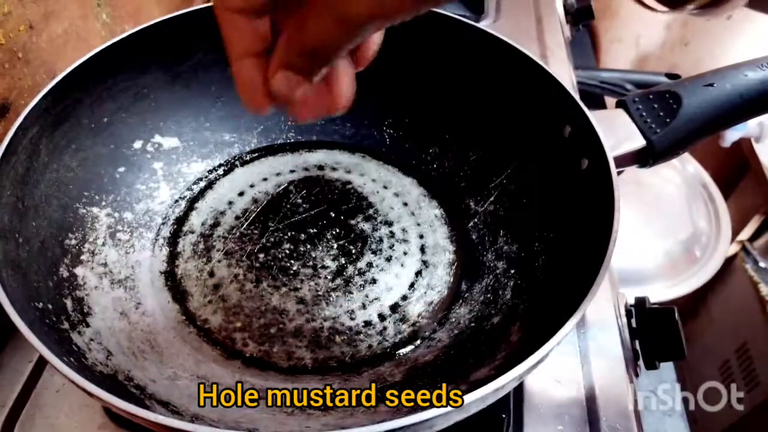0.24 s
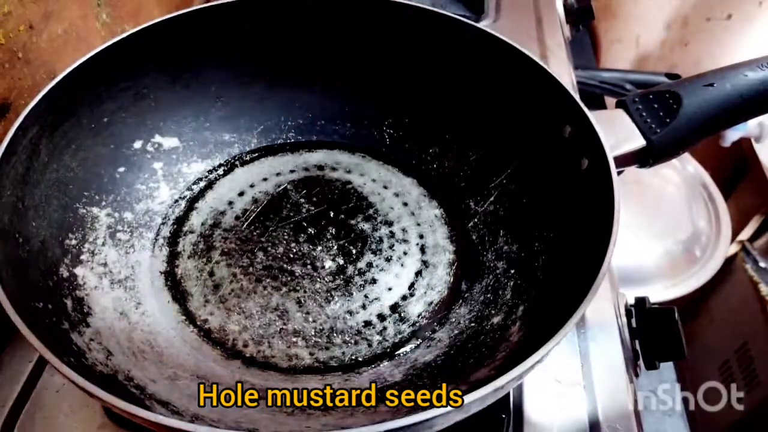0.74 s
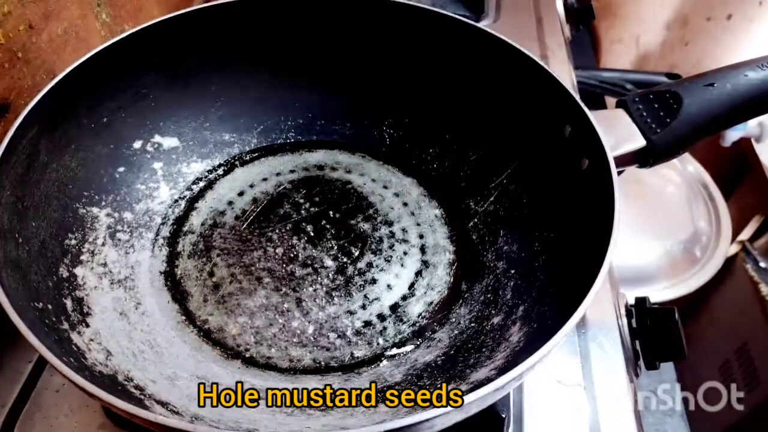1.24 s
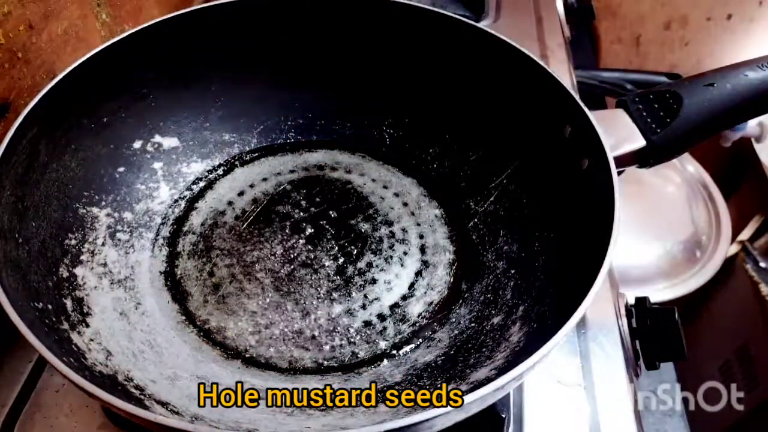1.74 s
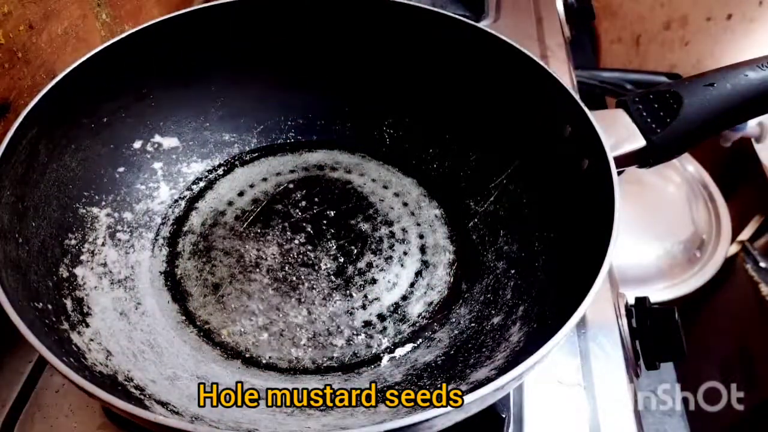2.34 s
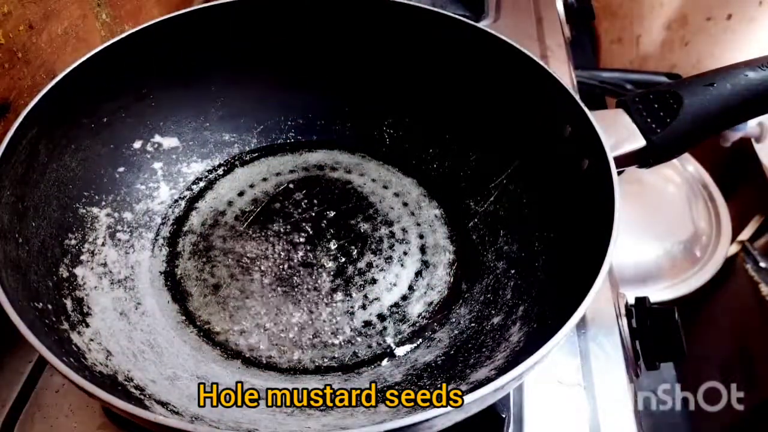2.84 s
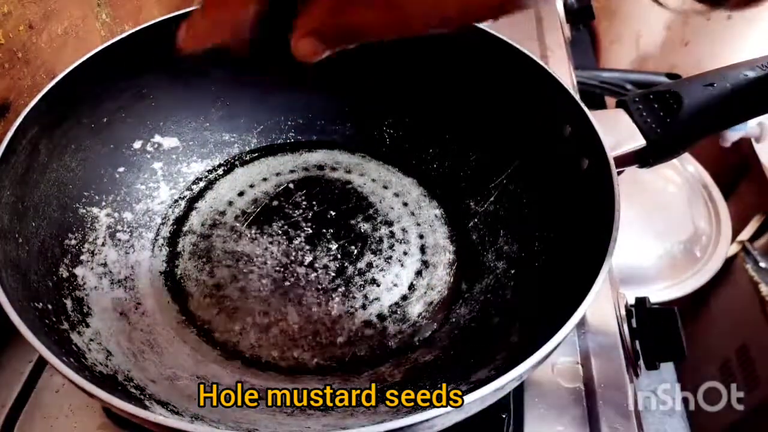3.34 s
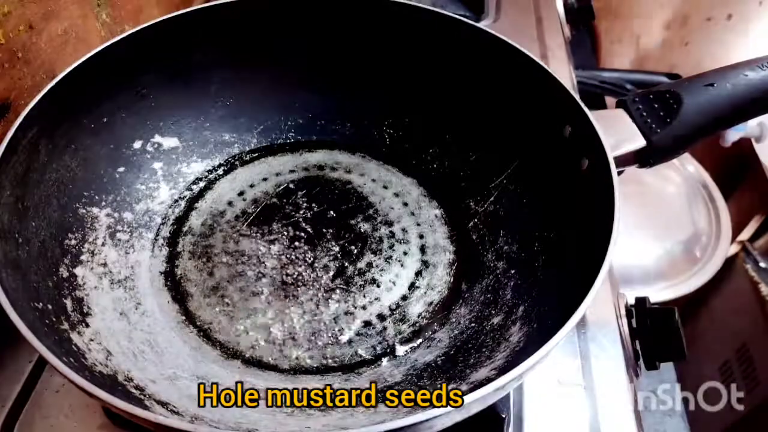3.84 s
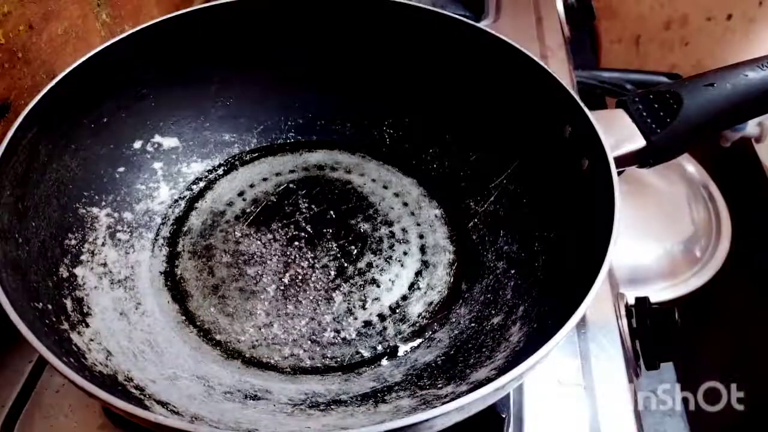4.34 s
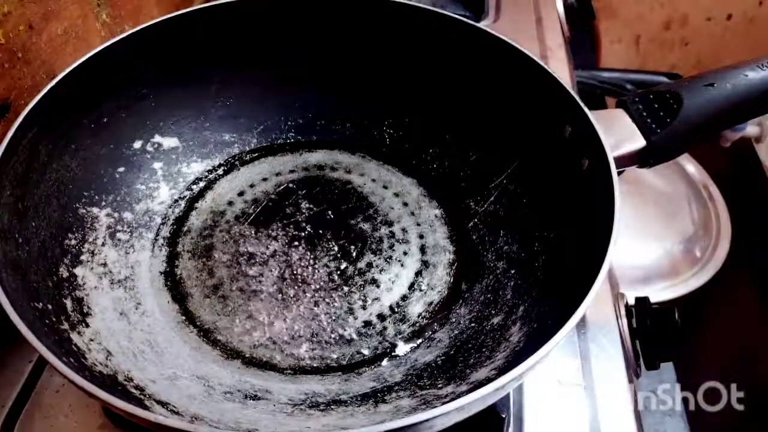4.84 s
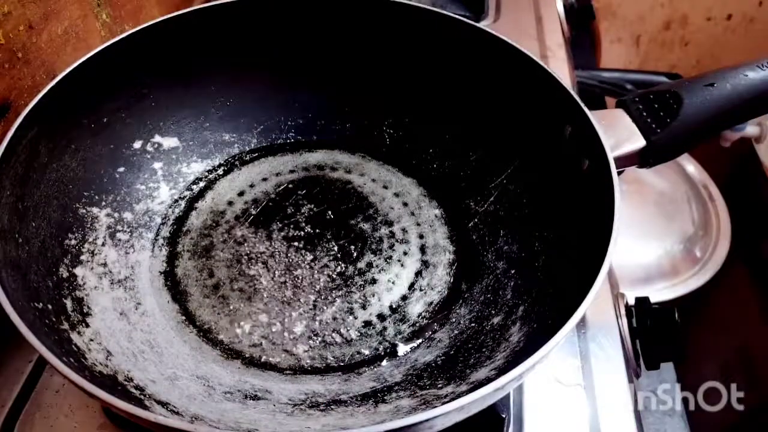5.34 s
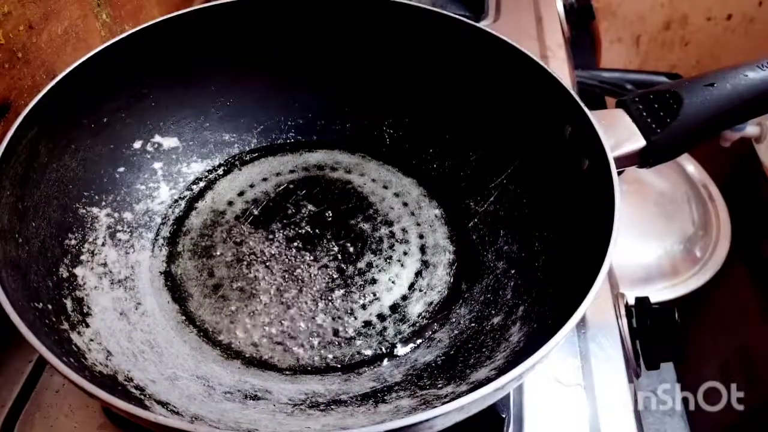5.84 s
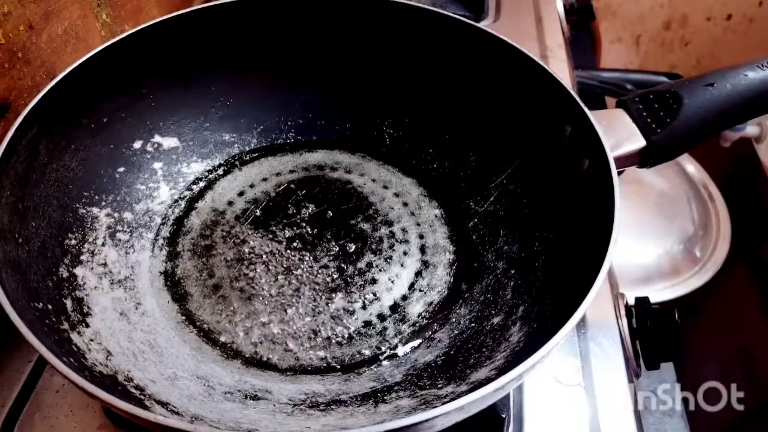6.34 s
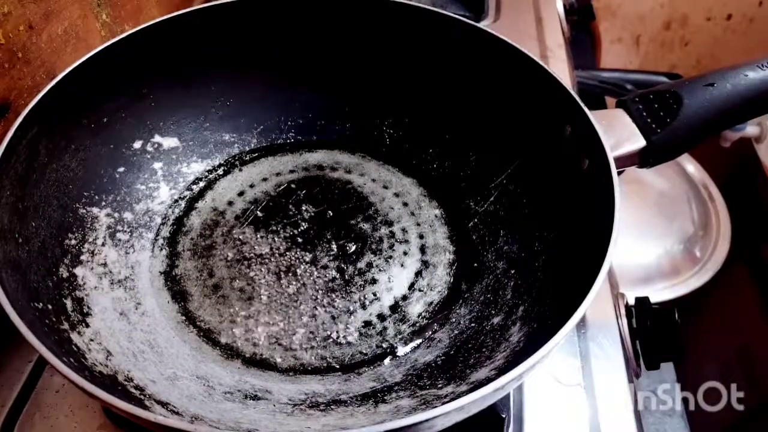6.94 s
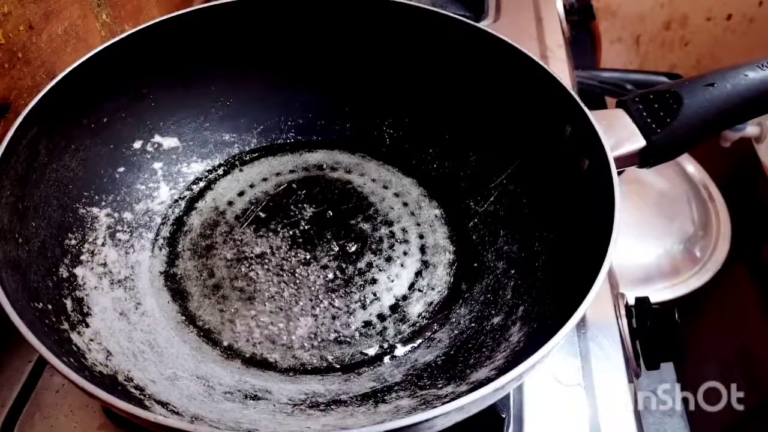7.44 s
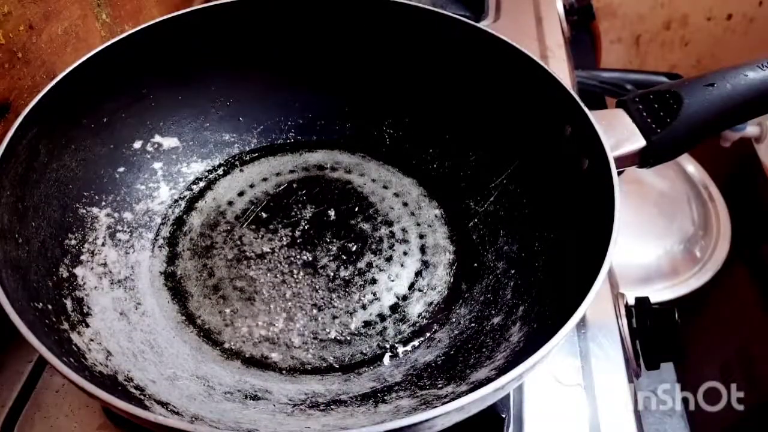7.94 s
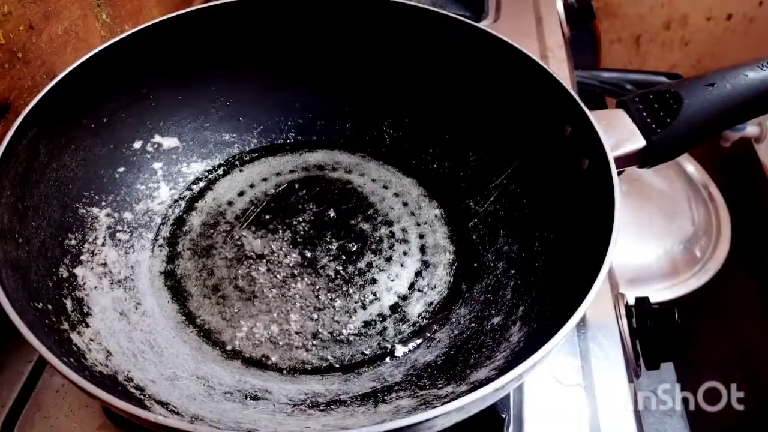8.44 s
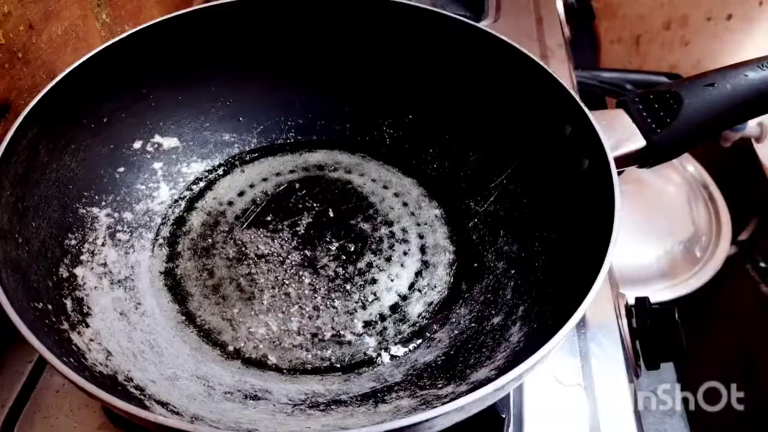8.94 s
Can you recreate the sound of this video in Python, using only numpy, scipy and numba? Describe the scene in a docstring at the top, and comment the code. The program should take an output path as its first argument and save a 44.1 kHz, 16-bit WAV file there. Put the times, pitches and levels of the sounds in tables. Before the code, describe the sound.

Close above a stovetop pan, grainy seeds sprinkle into oil, followed by isolated and clustered crisp pops, each a hard click with a short pan ring. Another brief sprinkle comes near three seconds. Thin bright fizz continues throughout, with a low quiet kitchen motor behind. The loudest cracks come late, momentarily pushing the background down before it creeps back.

```python
"""Mustard seeds first patter into hot oil, then pop one by one in a metal pan while the oil sizzles on.
Each pop is a click with echoes and a fading noise tail, both sent through resonances of shell and pan.
Filtered grainy noise makes the sizzle and patter; two short blips and a humming kitchen motor are sines.
A phone above the pan hears each sound twice, a hand's width apart, and its gain control ducks after
the loudest pops and creeps back."""
import sys
import numpy as np
from scipy import signal
from scipy.fft import rfft, irfft, next_fast_len
from scipy.io import wavfile
from scipy.ndimage import uniform_filter1d
from numba import njit

SR = 44100
rng = np.random.default_rng(int(sys.argv[2]) if len(sys.argv) > 2 else 0)


def unload_audio(sound):
    """Save the sound as a 16-bit wav file, at the path given as the first command line argument."""
    columns = np.transpose(np.atleast_2d(sound))
    # keep every value between -1 and 1, then stretch to whole-number steps
    steps = np.round(np.clip(columns, -1, 1) * 32767)
    wavfile.write(sys.argv[1], SR, steps.astype(np.int16))


N = 405587

# Source levels apply ahead of the two paths to each ear and the gain control.
# bursting seeds: start_s, crack_peak_db, spit_db, rim_db, ring_db, ring_centre_hz
POPS = [(0.8901, -15.5, -42, -49, -39, 4700), (1.003, -13.5, -34, -39, -39, 4200),
        (1.0795, -32, -51, -45, -54, 4310), (1.1292, -3.5, -30.5, -34.5, -39, 4260),
        (1.199, -9, -39.5, -44, -30, 3070), (1.8347, -16.5, -41, -34, -51.5, 3920),
        (2.0565, -9, -34, -45, -51, 3800), (2.1391, -18, -34, -34.5, -29, 2960),
        (2.2906, -6.5, -32.5, -35.5, -29, 2950), (2.4306, -40, -40.5, -43, -33, 3420),
        (2.6943, -15, -43.5, -40, -34, 3700), (3.1555, 3.5, -24, -39.5, -44.5, 3530),
        (3.3124, -11.5, -39, -42.5, -41, 4100), (3.376, -40, -55, -58, -41, 3170),
        (3.4026, -19, -37.5, -44, -29, 3200), (3.4452, -11, -44.5, -37.5, -29, 3230),
        (3.4937, -13, -32, -52, -52, 3510), (3.9114, -9.5, -46.5, -42.5, -32.5, 3340),
        (4.0455, -33, -35.5, -55, -77, 4095), (4.237, -44, -39, -62, -74, 3860),
        (4.6676, -27.5, -36, -38.5, -29, 3350), (4.7087, -6.5, -28, -41.5, -45, 3990),
        (4.7512, -6, -29.5, -42, -50, 4000), (5.054, -9, -37.5, -37.5, -41.5, 3660),
        (5.554, -13.5, -45.5, -57, -57, 3630), (5.783, -14.5, -48, -56, -61, 3700),
        (5.8067, -15, -42, -51, -32, 2300), (5.896, -22, -41, -52, -55.5, 3600),
        (6.0048, -3, -27.5, -40.5, -50, 3970), (6.3118, -12.5, -35, -38, -46.5, 4100),
        (6.43, -45.5, -49, -65, -75, 3640), (6.478, -2.5, -28.5, -32, -40.5, 3720),
        (6.7187, -1, -25, -41, -43, 3560), (6.9566, -30, -45.5, -49, -56.5, 4100),
        (7.0127, -5.5, -24.5, -35.5, -52, 3980), (7.126, -21, -44, -52, -53, 4320),
        (7.1924, -12.5, -43, -41, -33, 3640), (7.4743, -9, -28.5, -57, -53, 4110),
        (7.596, -14.5, -44.5, -47.5, -53, 4000), (7.6761, -4.5, -27, -36, -44, 3810),
        (7.7119, 6, -10, -23, -29, 3930), (7.7541, -8, -39, -59, -55, 3940),
        (7.785, -3, -26, -43, -48, 4000), (8.012, -29, -43, -56, -63, 3700),
        (8.1302, -1.5, -27.5, -39.5, -51, 4170), (8.276, -7.5, -29.5, -50, -54, 3260),
        (8.3478, -5.5, -29, -42, -49, 3830), (8.4284, 4.5, -17, -30, -41, 4230),
        (8.5692, -19.5, -29.5, -34.5, -44.5, 3830), (8.618, -60, -56, -61, -47, 3700),
        (8.9658, -3.5, -28.5, -42, -70, 4280)]
# clumps of seeds landing in the oil: start_s, spit_db, rim_db
LANDINGS = [(0.014, -36.5, -59), (0.053, -36.5, -68), (0.071, -41.5, -60), (0.095, -45, -60),
            (0.155, -39, -70), (0.2514, -47, -60), (0.3283, -44.5, -69), (0.3484, -49, -62),
            (0.3893, -41, -63), (0.434, -46, -62), (0.4762, -61, -53.5), (0.5294, -42, -68),
            (0.5467, -40, -48), (0.5826, -34.5, -37.5), (0.6123, -47, -44), (0.633, -35, -41),
            (0.69, -50, -47), (0.7602, -51, -63), (0.7977, -43, -43.5), (0.812, -40.5, -41.5),
            (3.2368, -43, -54), (3.355, -37, -57), (3.5527, -36.5, -48), (3.575, -39, -65)]
LAND_CRACK_DB, LAND_RING_DB, LAND_RING_HZ = 7, -24, 3620  # crack and ring relative to the spit
# faint pops at random moments
FAINT_COUNT, FAINT_SCATTER_DB, FAINT_RING_HZ = 16, 4.5, 3850
FAINT_DB = [-45, -46.5, -63, -65.5]  # mean crack, spit, rim, ring

# resonances of the bursting shell, oil spit, pan rim, pan modes and pan body:
# centre_hz, width_hz, relative_db
SHELL_MODES = [(11100, 2640, 24), (1050, 4800, -24), (14600, 9000, -23), (300, 330, 5)]
SPIT_MODES = [(8440, 2620, -5.5), (11030, 1560, -2.5), (13500, 600, -6), (14220, 950, -9.5)]
RIM_MODES = [(5420, 660, 2.3), (6120, 470, 6.1), (6810, 790, 0.76)]
RING_MODES = [(2250, 410, 10), (2760, 200, 7), (2860, 200, 1.5), (3174, 120, -3), (3324, 180, -3.5),
              (3480, 66, -2), (3580, 64, -9), (3800, 65, -1.5), (3820, 99, -10.5), (4204, 200, 1.5),
              (4430, 650, 4.5)]
BODY_MODES = [(930, 370, 3), (1339, 75, 10), (1650, 410, 0), (1790, 270, -0.5), (2320, 450, -1)]
RING_SPREAD_HZ = 507  # a seed wakes the pan modes near the centre of its ring

# how much each part colours the crack: spit_db, rim_db, ring_db, body_db
CRACK_SHARE_DB = [11, 3.2, 4.4, 2.8]
# 60 dB decay time of the slow tail: spit_s, rim_s, ring_s, body_s
TAIL_T60_S = [0.14, 0.12, 0.15, 0.19]
# delay of the tail behind the crack, spit latest: spit_s, rim_s, ring_s, body_s
TAIL_LAG_S = [.0013, .0007, .0003, .0003]
FIRST_T60_S, FIRST_DB = 0.036, 1  # quick first part of every tail, relative to the slow part
TAIL_TOP_HZ = 15900  # low-pass limit of the noise that feeds the fading tails
# reflections of the crack off pan wall and tiles: delay_s, relative_db
ECHOES = [(.0025, -13), (.0062, -29), (.0085, -23.5), (0.0104, -13)]
# pan body relative to crack and ring, stronger when the ring is low
BODY_CRACK_DB, BODY_RING_DB, BODY_DB_PER_OCTAVE, MID_RING_HZ = -44.5, -14, -14.5, 3160

# mean loudness of the oil sizzle: time_s, level_db
SIZZLE_LEVEL = [(0, -58.5), (.9, -52.5), (2.5, -50.5), (5, -51), (7, -51), (9.2, -50.5)]
# spectrum of the oil sizzle: frequency_hz, relative_db
SIZZLE_SPECTRUM = [(900, -13), (2000, -12), (3300, -11), (4400, -12.5), (6000, -8.5), (8500, -6.5),
                   (10800, 0), (13000, -10), (15600, -12), (16000, -52)]
# pinches of seeds falling into the pan: start_s, level_db, hold_s
PATTER = [(0, -40.5, 0.037), (0.16, -47, .02), (.392, -58, .05), (0.54, -43.5, 0.11), (0.786, -54, 0.035),
          (3.235, -37, 0.03), (3.356, -42.5, 0.096)]
PATTER_RISE_S, PATTER_FALL_DB_S = 0.0049, 139
# spectrum of the falling seeds: frequency_hz, relative_db
PATTER_SPECTRUM = [(900, -8.5), (2400, -15.5), (3800, -11.5), (6000, -5), (8500, 0), (10800, 8),
                   (13000, -14), (15600, -7), (16000, -50)]
# low pan modes that the falling seeds stir: centre_hz, width_hz, relative_db
PAN_HUM_MODES = [(826, 30, 0), (908, 30, 0)]
PAN_HUM_DB = -13.5  # relative to the patter

# short tones, level before fading and flutter: start_s, pitch_hz, level_db, length_s
BLIPS = [(8.025, 1614, -48.5, 0.012), (8.028, 1090, -47, 0.015)]

# motor tones: pitch_hz, mean_level_db, waver_db
MOTOR_TONES = [(99.2, -65.5, -0.43), (103.2, -63, 2.5), (173.6, -65, 2.5), (196.4, -51.5, 0.6),
               (342, -73, 0.5), (391.5, -69, 1.5), (783, -63, 1.5), (1400, -90, 2)]
# spectrum of the motor draught: frequency_hz, relative_db
DRAUGHT_SPECTRUM = [(15, -63), (25, -39), (92, -11), (141, -6), (196, -5.5), (248, -13), (694, -10),
                    (779, -9.5), (842, -10.5), (1730, -21.5), (2600, -41), (3380, -75), (5720, -120)]
DRAUGHT_DB = -58.5

# the two arrivals at each ear, the late one inverted: frequency_hz, early_db, late_db
LEFT_PATHS = [(603, -3, -33.5), (1460, -3.5, -4), (2520, -2, -6.5), (5200, -3.5, -5), (8100, -4, -8.5),
              (10400, -2.5, -4), (12800, -9.5, -1), (16000, -14, -3.5)]
RIGHT_PATHS = [(620, 0.5, -21.5), (1500, -1.5, -35), (2170, -4, -3), (4670, -0.5, -6), (6980, -2.5, -3),
               (9100, 0.5, 0.5), (12200, 1, -7), (17000, -0.5, -6.5)]
# inverse of the lag between the arrivals: left_hz, right_hz
INVERSE_LAG_HZ = [2590, 2360]
# wall-returned sizzle relative to the source sizzle, wall-returned draught to the source draught
DIFFUSE_SIZZLE_DB, DIFFUSE_DRAUGHT_DB = -22, -10.5

# gain control: threshold, recovery rate, smoothing time constant, delay; then the final cutoff
KNEE_DB, RELEASE_DB_S, ATTACK_S, REACT_S = -11.5, 10, .0025, .0008
TOP_HZ = 17000


def pops():
    """Impulsive excitation: a burst's crack and spit drive resonances of shell, rim, pan modes and body."""
    start_s, crack_db, spit_db, rim_db, ring_db, ring_hz = bursts()
    at = (start_s * SR).astype(int)
    body_from_ring_db = ring_db + BODY_RING_DB + BODY_DB_PER_OCTAVE * np.log2(ring_hz / MID_RING_HZ)
    body = np.hypot(undb(crack_db + BODY_CRACK_DB), undb(body_from_ring_db))
    tails = np.vstack([undb([spit_db, rim_db, ring_db]), body])
    # the crack is shared out among the parts by their tails and crack shares
    cracks = tails * undb(CRACK_SHARE_DB)[:, None]
    cracks *= undb(crack_db) / cracks.sum(axis=0)

    out = np.zeros(N)
    # the shell carries the spit's share of the crack
    parts = ((0, SHELL_MODES, SPIT_MODES), (1, RIM_MODES, RIM_MODES), (3, BODY_MODES, BODY_MODES))
    for k, crack_modes, tail_modes in parts:
        out += clicks(at, cracks[k], crack_modes)
        out += shower(at, tails[k], tail_modes, TAIL_T60_S[k], TAIL_LAG_S[k])

    hz, _, db = np.transpose(RING_MODES)
    woken = undb(db)[:, None] * np.exp(-.5 * ((hz[:, None] - ring_hz) / RING_SPREAD_HZ) ** 2)
    click_shares = woken / woken.sum(axis=0)  # peaks add
    tail_shares = woken / np.sqrt((woken ** 2).sum(axis=0))  # powers add
    for mode, click_share, tail_share in zip(RING_MODES, click_shares, tail_shares):
        out += clicks(at, cracks[2] * click_share, [mode])
        out += shower(at, tails[2] * tail_share, [mode], TAIL_T60_S[2], TAIL_LAG_S[2])
    return out


def bursts():
    """Superposition of events: pops, landings and randomly timed faint pops, in the columns of POPS."""
    start_s, spit_db, rim_db = np.transpose(LANDINGS)
    landed = [start_s, spit_db + LAND_CRACK_DB, spit_db, rim_db, spit_db + LAND_RING_DB,
              np.full(len(start_s), LAND_RING_HZ)]
    faint_s = rng.random(FAINT_COUNT) * (N / SR - .1)
    spread = rng.standard_normal((FAINT_COUNT, len(FAINT_DB)))
    faint_db = FAINT_DB + FAINT_SCATTER_DB * spread
    faint = [faint_s, *faint_db.T, np.full(FAINT_COUNT, FAINT_RING_HZ)]
    return np.hstack([np.transpose(POPS), landed, faint])


def clicks(at, size, modes):
    """Impulse response: each click and its reflections ring the modes; size is the direct click's peak."""
    train = np.zeros(N)
    train[at] = size / np.abs(resonate(signal.unit_impulse(200), modes)).max()
    echoed = train + sum(undb(db) * np.roll(train, int(s * SR)) for s, db in ECHOES)
    return resonate(echoed, modes)


def shower(at, size, modes, t60_s, lag_s):
    """Exponential decay: grainy noise drives the modes; size is the slow part's starting rms level."""
    power = np.zeros(N)
    power[at + int(lag_s * SR)] = size ** 2
    slow = fading(power, t60_s)
    quick = fading(power, FIRST_T60_S)
    lowpass = signal.ellip(6, .5, 50, TAIL_TOP_HZ, fs=SR, output="sos")
    noise = signal.sosfilt(lowpass, grains(3.5, 900))
    strength = np.sqrt(np.mean(resonate(noise, modes) ** 2))
    return resonate(np.sqrt(slow + undb(FIRST_DB) ** 2 * quick) * noise / strength, modes)


def fading(power, t60_s):
    """Reverberant energy law: power decays exponentially by 60 dB in t60_s."""
    return signal.lfilter([1], [1, -np.exp(-2 * np.log(1000) / (t60_s * SR))], power)


def oil():
    """Broadband bubble noise: a steady fizz, with pinches of seeds on top that stir low pan modes."""
    t = np.arange(N) / SR
    fizz = tinted(grains(0.91, 1500), SIZZLE_SPECTRUM) * undb(curve(SIZZLE_LEVEL) + 0.78 * walk(10))
    falling = np.zeros(N)
    for start_s, db, hold_s in PATTER:
        # the rise ends at start_s, then the level holds and thins out
        rise = np.clip((t - start_s) / PATTER_RISE_S + 1, 0, 1)
        falling += rise * undb(db - PATTER_FALL_DB_S * np.maximum(t - start_s - hold_s, 0))
    seeds = tinted(grains(3.0, 250), PATTER_SPECTRUM)
    stirred = undb(PAN_HUM_DB) * unit(resonate(rng.standard_normal(N), PAN_HUM_MODES))
    return fizz + falling * (seeds + stirred)


def blips():
    """Amplitude modulation: short sines with half-sine envelopes and a random flutter."""
    out = np.zeros(N)
    for start_s, hz, db, length_s in BLIPS:
        t = np.arange(int(length_s * SR)) / SR
        envelope = np.sqrt(2) * undb(db) * np.sin(np.pi * t / length_s)
        first = int(start_s * SR)
        out[first:first + len(t)] += envelope * np.sin(2 * np.pi * hz * t)
    return out * undb(5.0 * walk(120))


def motor():
    """Tonal and broadband noise: sines that waver in level and phase over a soft draught."""
    t = np.arange(N) / SR
    tones = np.zeros(N)
    for hz, db, waver_db in MOTOR_TONES:
        level = np.sqrt(2) * undb(db + waver_db * walk(5))
        tones += level * np.sin(2 * np.pi * hz * t + 0.96 * waver_db * walk(3))
    return tones + undb(DRAUGHT_DB) * tinted(rng.standard_normal(N), DRAUGHT_SPECTRUM)


def resonate(x, modes):
    """Modal superposition: parallel band-passes of alternating sign."""
    out = 0
    for k, (hz, width, db) in enumerate(modes):
        out = out + (-1) ** k * undb(db) * signal.lfilter(*signal.iirpeak(hz, hz / width, SR), x)
    return out


def grains(scatter_db, rate):
    """Random modulation: noise of unit rms whose loudness varies from grain to grain."""
    return unit(rng.standard_normal(N) * undb(scatter_db * walk(rate)))


def walk(rate):
    """Smoothed random process: levels held 1 / rate s and averaged twice, with spread near 1."""
    k = int(SR / rate)
    held = np.repeat(rng.standard_normal(N // k + 1), k)
    return 1.18 * uniform_filter1d(uniform_filter1d(held, k), k)[:N]


def colour(x, rows, column=1):
    """Linear filtering: the spectrum of x weighted by a column of dB against frequency."""
    size = next_fast_len(N)
    hz = np.arange(size // 2 + 1) * SR / size
    rows = np.array(rows, float)
    weight_db = np.interp(np.log(hz + 1), np.log(rows[:, 0]), rows[:, column])
    return rfft(x, size) * undb(weight_db), hz, size


def tinted(x, rows):
    """Spectral shaping: x filtered and brought to unit rms."""
    spectrum, _, size = colour(x, rows)
    return unit(irfft(spectrum, size)[:N])


def curve(rows):
    """Linear interpolation: a table of values against seconds, at every sample."""
    return np.interp(np.arange(N) / SR, *np.transpose(rows))


def undb(db):
    """Decibel law: 20 dB is a factor of ten in amplitude."""
    return 10 ** (np.asarray(db, float) / 20)


def unit(x):
    """Normalisation: x at unit rms."""
    return x / np.sqrt(np.mean(x ** 2))


def scene():
    """Comb interference: the late inverted arrival tends to notch each ear at multiples of the inverse lag."""
    sound = pops() + oil() + blips() + motor()
    ears = []
    for paths, inverse_lag_hz in zip((LEFT_PATHS, RIGHT_PATHS), INVERSE_LAG_HZ):
        early, hz, size = colour(sound, paths, column=1)
        late = colour(sound, paths, column=2)[0] * np.exp(-2j * np.pi * hz / inverse_lag_hz)
        # a little fizz and draught come back from the walls, unrelated at the two ears
        fizz = tinted(rng.standard_normal(N), SIZZLE_SPECTRUM)
        draught = tinted(rng.standard_normal(N), DRAUGHT_SPECTRUM)
        diffuse = undb(DIFFUSE_SIZZLE_DB + curve(SIZZLE_LEVEL)) * fizz
        diffuse += undb(DRAUGHT_DB + DIFFUSE_DRAUGHT_DB) * draught
        ears.append(irfft(early - late, size)[:N] + diffuse)
    return np.array(ears)


@njit
def duck(peak_db, knee_db, fall_db, follow):
    """Peak detection: excess over the knee jumps up, sinks at a steady dB rate and is followed with a lag."""
    out, held, now = np.empty(len(peak_db)), 0., 0.
    for i in range(len(peak_db)):
        held = max(held - fall_db, peak_db[i] - knee_db, 0.)
        now += follow * (held - now)
        out[i] = now
    return out


def record(dry):
    """Dynamic compression: the louder channel drives both gains; peaks are clipped, then the top is cut."""
    peak_db = 20 * np.log10(np.abs(dry).max(axis=0) + 1e-9)
    excess_db = duck(peak_db, KNEE_DB, RELEASE_DB_S / SR, 1 / (ATTACK_S * SR))
    delay = int(REACT_S * SR)
    excess_db = np.roll(excess_db, delay)  # late enough for the first crack to slip through
    excess_db[:delay] = 0
    wet = np.clip(dry * undb(-excess_db), -1, 1)
    return signal.sosfilt(signal.ellip(8, .2, 70, TOP_HZ, fs=SR, output="sos"), wet)


dry = scene()
out = record(dry)
unload_audio(out)
```